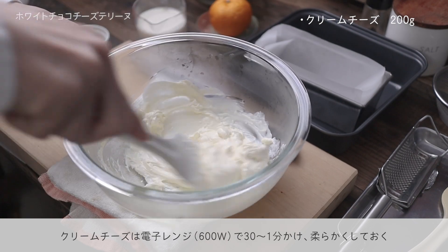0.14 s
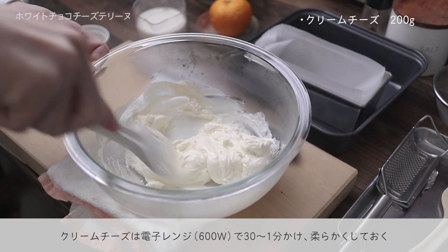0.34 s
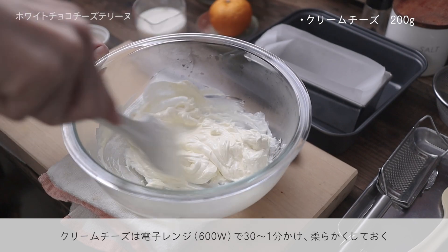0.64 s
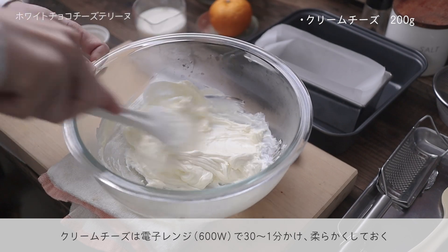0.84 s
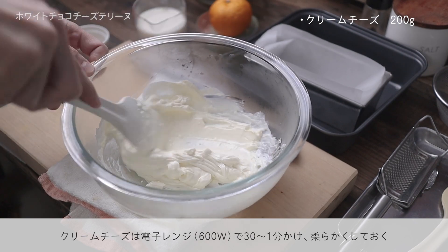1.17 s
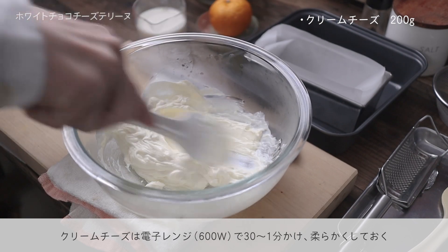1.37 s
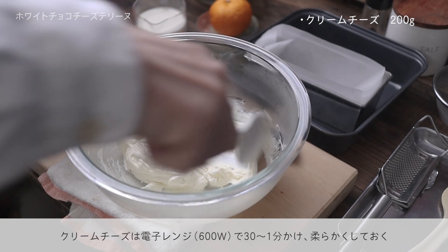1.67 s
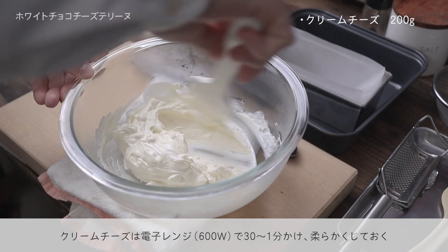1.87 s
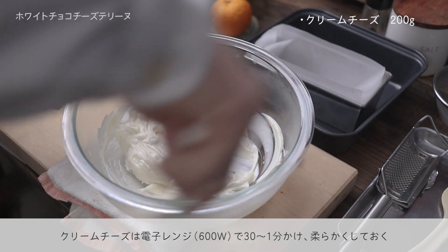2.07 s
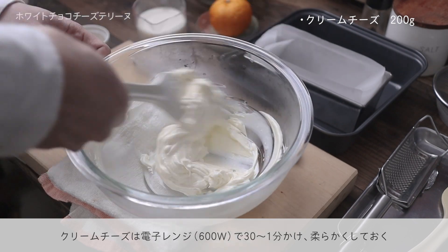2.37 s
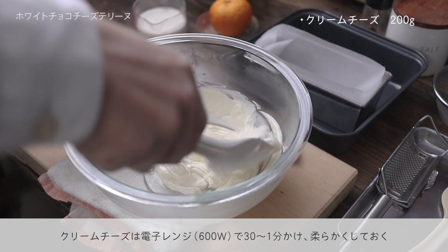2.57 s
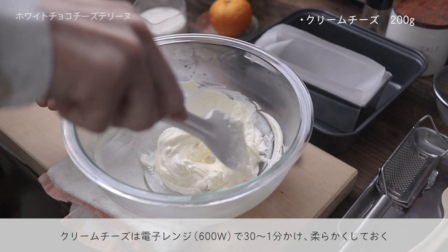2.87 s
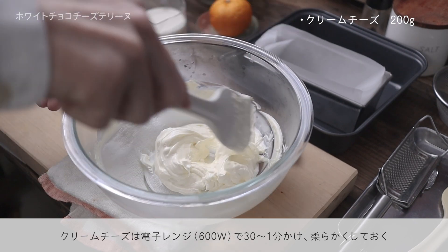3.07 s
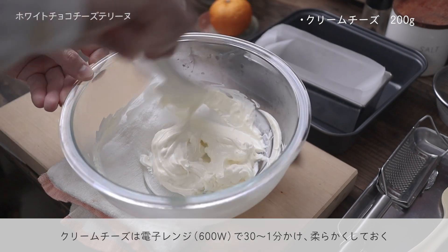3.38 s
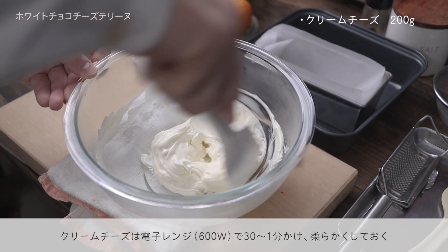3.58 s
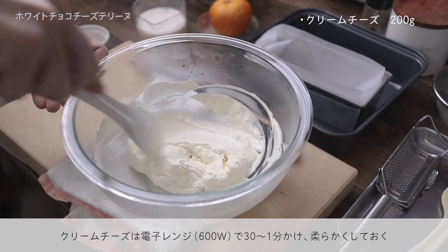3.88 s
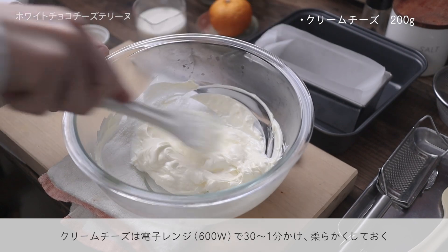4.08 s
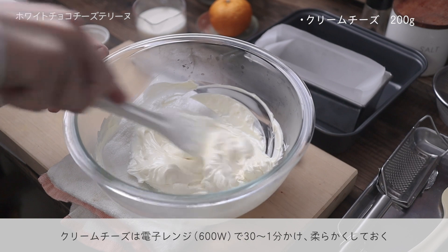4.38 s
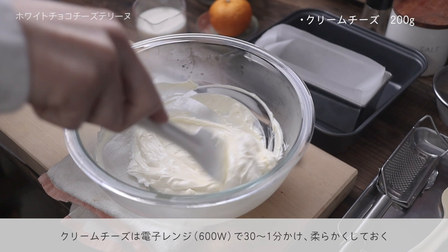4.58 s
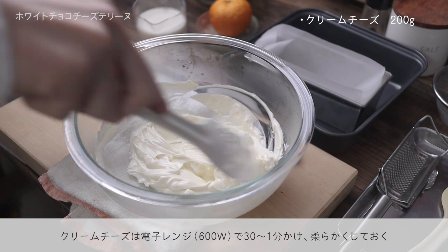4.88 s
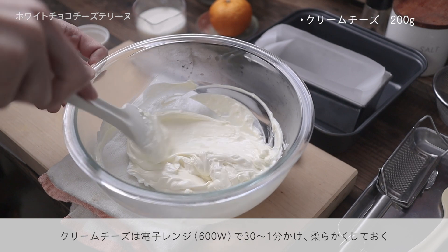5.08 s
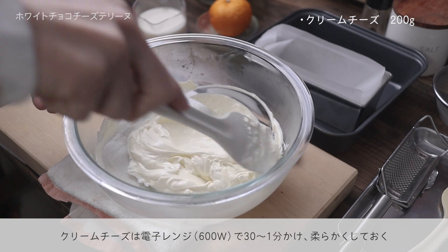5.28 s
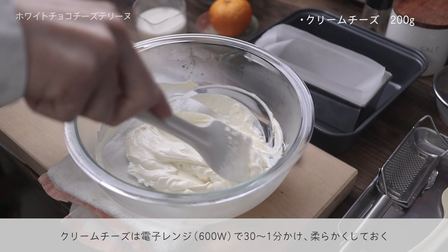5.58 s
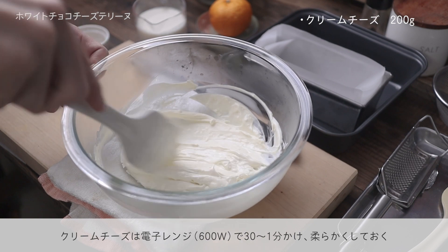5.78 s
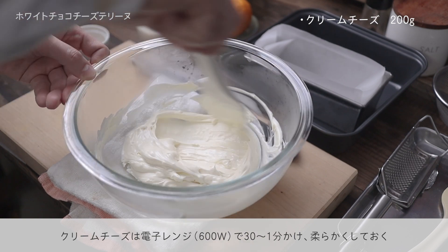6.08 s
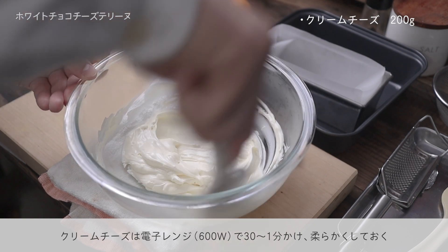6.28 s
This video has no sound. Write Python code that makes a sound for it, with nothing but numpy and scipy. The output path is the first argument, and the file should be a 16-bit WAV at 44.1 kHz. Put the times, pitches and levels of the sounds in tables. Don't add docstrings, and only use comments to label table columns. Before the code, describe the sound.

Close wet snaps and squelchy pops from thick cheese paste in a glass bowl, busy at first, then sparse, over kitchen fan noise.

```python
import sys
import numpy as np
from scipy import signal
from scipy.fft import rfft, irfft, next_fast_len
from scipy.io import wavfile
from scipy.ndimage import uniform_filter1d, minimum_filter1d

SR = 44100
rng = np.random.default_rng(int(sys.argv[2]) if len(sys.argv) > 2 else 0)


def generate_wav(sig):
    pcm = np.round(np.clip(np.atleast_2d(sig).T, -1, 1) * 32767).astype(np.int16)
    wavfile.write(sys.argv[1], SR, pcm)


def invert_db(x):
    u = np.asarray(x, float) / 20
    return 10 ** u


N = 284004


def at_hz(points, hz, column=1):
    table = np.array(points)
    return np.interp(np.log(hz), np.log(table[:, 0]), table[:, column])


def rms_one(x):
    return x / np.sqrt(np.mean(x ** 2) + 1e-20)


def bandpass(x, low_hz, high_hz):
    return signal.sosfilt(signal.butter(2, [low_hz, high_hz], "band", fs=SR, output="sos"), x)


# frequency in Hz, density in dB per Hz.
AIR_SPECTRUM = [(22, -18.5), (33, -20), (43, -6), (69, -11), (135, 0.5), (281, -2), (616, -5.5), (920, -10),
                (1000, -3.5), (2300, -11), (5500, -18.5), (10500, -31), (15700, -31.5), (16100, -61)]
# centre in Hz, width in Hz, boost in dB.
DUCT_MODES = [(41.2, 13, 8), (136, 16, 1), (220, 18, 6.5), (283.7, 10, 5), (517.8, 17, 7.5),
              (709.7, 69, 10.5), (1050, 64, 6), (1415, 54, 7.5), (1800, 50, 7.5), (2140, 86, 6),
              (2970, 190, 5.5), (4550, 1100, 4.5)]
HUM_DB = -43.5


def hum():
    size = next_fast_len(N)
    hz = np.maximum(np.arange(size // 2 + 1) * SR / size, 1)
    level_db = at_hz(AIR_SPECTRUM, hz)
    for centre_hz, width_hz, boost_db in DUCT_MODES:
        level_db = level_db + boost_db / (1 + (2 * (hz - centre_hz) / width_hz) ** 2)
    spectrum = rfft(rng.standard_normal(size)) * invert_db(level_db)
    return invert_db(HUM_DB) * rms_one(irfft(spectrum, size)[:N])


ATTACK, DECAY = 1.6, 0.85
PITCH_RISE = 0.16


def add_burst(out, start_s, peak_db, hz, length_ms, phase):
    half = max(length_ms, 0.1) * SR / 2000
    u = np.arange(-int(3 * half) - 1, int(10 * half) + 2) / half
    shape = np.where(u < 0, np.exp(-ATTACK * u ** 2), 1 / np.cosh(DECAY * u))
    glide = PITCH_RISE * np.log(np.cosh(u / 2))
    turn = 2 * np.pi * min(hz, 16400) * half / SR * (u + 2 * glide)
    at = np.clip(round(start_s * SR) + np.round(u * half).astype(int), 0, N - 1)
    out[at] += invert_db(peak_db) * shape * np.cos(turn + phase)


# start in seconds, peak level in dB, frequency in Hz, length in ms.
BOWL_PUSHES = [
    (1.53, -49, 45, 59),
    (1.8, -54, 45, 40),
    (5.42, -46, 40, 22),
    (5.472, -41, 57, 37),
    (5.488, -38.5, 210, 28),
    (6.275, -38, 209, 13),
]


def thuds():
    out = np.zeros(N)
    for row, phase in zip(BOWL_PUSHES, rng.uniform(0, 2 * np.pi, len(BOWL_PUSHES))):
        add_burst(out, *row, phase)
    return out


# time in seconds, hiss level in dB.
BLADE_DRAG = [(0.0, -80), (0.29, -64), (0.57, -69), (0.84, -74.5), (1.24, -72.5), (1.43, -82),
              (2.02, -57.5), (3.26, -84.5), (3.73, -65), (3.95, -86), (4.86, -72.5), (6.44, -68.5)]
CRACKLES_PER_S = 70


def smear():
    drag_s, drag_db = np.transpose(BLADE_DRAG)
    born = rng.random(N) < CRACKLES_PER_S / SR
    size_db = 4.0 * np.minimum(rng.exponential(1, N), 4) - 54.5
    sizes = invert_db(size_db) * rng.choice([-1, 1], N)
    crackles = bandpass(born * sizes + 1e-18, 7000, 16000)
    hiss = rms_one(bandpass(rng.standard_normal(N), 7000, 16000))
    hiss_db = np.interp(np.arange(N) / SR, drag_s, drag_db) - 10
    return crackles, hiss * invert_db(hiss_db)


# delay in ms, level in dB.
ECHO_DECAY = [(0, -56.5), (2, -29.5), (6, -34), (12, -32.5), (30, -40.5), (50, -49.5), (65, -55),
              (100, -71), (200, -90)]
# frequency in Hz, level in dB, extra loss in dB per second.
ECHO_COLOUR = [(698, 6, -6), (2000, -1, 0), (5000, -3, 33), (9000, -11, 71), (15000, -6.5, 84)]


def echo(x):
    ms = np.arange(SR // 5) / SR * 1000
    edges = 500 * 2 ** np.arange(0, 5.1, 0.5)
    white = rng.standard_normal((2, len(ms)))
    answer = 0
    for k, (low, high) in enumerate(zip(edges, edges[1:])):
        hz = np.sqrt(low * high)
        loss_db = at_hz(ECHO_COLOUR, hz, column=2) * ms / 1000
        band = bandpass(white[k % 2], low, high)
        answer = answer + band * invert_db(at_hz(ECHO_COLOUR, hz) - loss_db)
    envelope = invert_db(np.interp(ms, *np.transpose(ECHO_DECAY)))
    return signal.oaconvolve(x, answer * envelope)[:N]


# time before the burst in ms, level in dB.
LEAD_IN_SWELL = [(0, -24), (4, -58), (12, -52.5), (25, -69)]


def lead_in(x):
    ms = np.arange(SR // 30) / SR * 1000
    swell = rng.standard_normal(len(ms)) * invert_db(np.interp(ms, *np.transpose(LEAD_IN_SWELL)))
    return signal.oaconvolve(x[::-1], swell)[:N][::-1]


# start in seconds, peak level in dB, cavity frequency in Hz, length in ms,
# mouth snap level in dB.
SHALLOW_POCKETS = [(0.066, -25.5, 4800, 0.19, -42), (.2764, -24, 3250, 1.5, -42.5),
                   (.35, -9.5, 3250, .36, -38.5), (.369, -9.5, 3200, .36, -27),
                   (0.4649, -10, 3780, .36, -55), (0.4718, -15, 2470, .57, -35),
                   (.4908, -22, 5570, 0.28, -40.5), (.6285, -5, 5000, .18, -17),
                   (.9416, -13.5, 3300, .6, -24), (0.9456, -3, 6400, .4, -6),
                   (1.2166, -35.5, 4500, .5, -30.5), (1.236, -3, 1850, 1.7, -40),
                   (1.2398, -2, 4100, .35, -16), (1.2429, -12, 4600, .4, -19),
                   (1.477, -21.5, 2150, .74, -58), (1.8715, -33.5, 4650, .3, -41.5),
                   (2.196, -32, 6030, 0.42, -37.5), (2.5244, -35.5, 4830, .3, -45),
                   (4.6455, -26.5, 5570, 0.29, -53), (4.8199, -9, 3500, .9, -33),
                   (5.1535, -28, 3500, 2.1, -36), (5.4675, -34, 3300, .4, -29),
                   (5.483, -2.5, 4900, .52, -12), (5.7979, -24, 7800, .24, -49)]
# start in seconds, peak level in dB, cavity frequency in Hz,
# level change from mode to mode in dB, mouth snap level in dB.
DEEP_POCKETS = [
    (0.5217, -31, 2100, -1, -65),
    (0.6286, -30.5, 1300, 0.5, -40.5),
    (.9461, -19, 1300, .5, -29.5),
    (1.2359, -16, 1150, .8, -28),
    (1.477, -33.5, 900, -3.5, -50),
    (1.5309, -13, 1500, -5, -27),
    (4.5284, -15, 1200, .3, -36),
    (5.483, -14, 1800, .8, -30),
]
CAVITY_MODES = [(1, 0), (1.68, 1), (2.5, 2), (3.4, 3.5)]
# start in seconds, peak level in dB, frequency in Hz, length in ms.
SMALL_BLISTERS = [(0.0567, -33.5, 1427, 1.3), (0.0932, -26.5, 5130, 0.14), (.1415, -26.5, 7100, .35),
                  (.238, -38, 4030, .6), (.2438, -33.5, 6550, .62), (.5601, -19, 3500, .5),
                  (.714, -34.5, 5650, .76), (.722, -33.5, 6030, .27), (.7337, -15.5, 4700, .33),
                  (.914, -34.5, 5660, .55), (.9442, -14, 3700, .9), (1.2308, -30, 3200, .57),
                  (1.233, -24.5, 8200, 0.49), (1.2405, -11, 2150, 7.), (1.3077, -19.5, 3990, .62),
                  (1.616, -29, 3530, .63), (2.246, -34.5, 4110, .37), (2.4757, -36, 5300, .24),
                  (3.7337, -22, 6000, .45), (4.349, -34, 2850, .77), (4.5288, -15, 1050, 2.4),
                  (4.7299, -37.5, 3480, .74), (4.8271, -18, 3900, 0.4), (4.9248, -30.5, 3790, .51),
                  (5.1455, -21, 1300, 2.6), (5.3793, -29.5, 4500, .4), (5.4901, -10, 2800, 0.33),
                  (5.7292, -38.5, 6030, .3), (5.7975, -30.5, 2763, .49), (5.9753, -36, 5510, .32)]
# start in seconds, peak level in dB, frequency in Hz,
# length in ms.
WHISTLING_NECKS = [(0.2087, -24, 2600, 1.3), (.2087, -27, 4430, .65), (.211, -29, 2580, .72),
                   (.2099, -38, 12580, .16), (0.521, -25, 1750, 1.97), (.5213, -25, 3300, .5),
                   (.6285, -23.5, 2250, 1.2), (.9414, -22, 950, 1.2), (1.2398, -8, 14200, .4),
                   (1.2166, -27.5, 15500, 0.53), (1.2359, -20, 770, 1.9), (1.2398, -9, 6430, .5),
                   (1.474, -36, 14300, .2), (1.5309, -22.5, 7220, 0.47), (1.7538, -40, 5660, .2),
                   (2.1251, -31, 2655, 1.22), (2.1257, -26.5, 4450, .8), (2.1252, -28, 10000, .1),
                   (3.0945, -48, 2196, .6), (1.531, -27, 820, 1.5), (3.3936, -44.5, 2200, .6),
                   (3.8042, -38, 4650, .5), (4.0852, -45, 13440, .22), (4.5285, -26, 14800, .3),
                   (4.8199, -15, 2850, .9), (4.8199, -25, 4700, .7), (4.8278, -38, 12060, .3),
                   (4.5286, -28, 10200, .3), (5.1533, -35, 2630, 1.2), (5.4824, -19, 15800, .6)]
# start in seconds, peak level in dB, frequency in Hz.
TEARING_FILMS = [(.0679, -39, 8400), (.0764, -38, 12920), (.3862, -44, 11540), (.494, -26.5, 12230),
                 (.502, -30, 8360), (.5952, -38, 14130), (.6258, -34, 12100), (.8746, -40, 12880),
                 (.916, -38, 10700), (.922, -39, 14130), (.9459, -4, 12500), (1.0035, -27, 8750),
                 (1.0405, -38, 13780), (1.1675, -40, 12580), (1.785, -34, 14800), (1.8285, -31, 10000),
                 (1.8715, -17, 14600), (2.4919, -40, 15100), (2.891, -37.5, 12400), (3.5538, -37, 13000),
                 (3.5657, -38, 13090), (3.5782, -39, 12230), (3.873, -41, 13090), (3.9766, -43, 11540),
                 (4.2292, -39, 13500), (4.2861, -36, 10900), (4.3462, -34.5, 11200), (5.4609, -36.5, 11600),
                 (6.0168, -26, 15000), (6.0708, -37, 13400)]
# frequency in Hz, level in dB.
MOUTH_BANDS = [(8100, -1), (10300, -14.0), (12800, -4.0), (15200, -12)]
CAVITY_CYCLES = 1.98
FILM_MS, SNAP_MS = 0.15, 0.3


def bursts():
    rows = []
    for start_s, peak_db, lowest_hz, step_db, _ in DEEP_POCKETS:
        for ratio, steps in CAVITY_MODES:
            hz = lowest_hz * ratio
            rows.append((start_s, peak_db + steps * step_db, hz, 1000 * CAVITY_CYCLES / hz))
    rows += [row[:4] for row in SHALLOW_POCKETS]
    rows += SMALL_BLISTERS + WHISTLING_NECKS
    rows += [(*row, FILM_MS) for row in TEARING_FILMS]
    for row in DEEP_POCKETS + SHALLOW_POCKETS:
        rows += [(row[0], row[4] + db, hz, SNAP_MS) for hz, db in MOUTH_BANDS]
    out = np.zeros(N)
    phases = rng.normal(np.pi / 2, 0.4, len(rows))
    for row, phase in zip(rows, phases):
        add_burst(out, *row, phase)
    return signal.sosfilt(signal.butter(4, 750, "high", fs=SR, output="sos"), out + 1e-18)


def scene():
    air = hum()
    crackles, hiss = smear()
    paste = bursts() + crackles
    return (paste + lead_in(paste) + echo(paste) + hiss + thuds() + air)[None]


GATE_DEPTH_DB, GATE_OVER_DB, GATE_KNEE_DB = 10, 10.5, 2.5


def noise_gate(x):
    size = next_fast_len(N)
    spectrum, hz = rfft(x, size), np.arange(size // 2 + 1) * SR / size
    edges = np.append(960 * 2 ** (np.arange(12) / 3), SR)
    out = x.copy()
    for low, high in zip(edges, edges[1:]):
        band = irfft(spectrum * ((hz >= low) & (hz < high)), size)[:N]
        level_db = 10 * np.log10(uniform_filter1d(band ** 2, size=300)[::50] + 1e-12)
        threshold_db = np.median(level_db) + GATE_OVER_DB
        opened = 1 / (1 + np.exp((threshold_db - level_db) / GATE_KNEE_DB))
        held = -minimum_filter1d(-opened, size=39, origin=19)
        shut = 1 - np.repeat(uniform_filter1d(held, size=7), 50)[:N]
        out += band * (invert_db(-GATE_DEPTH_DB * shut) - 1)
    return out


def band_limit(x):
    return signal.sosfilt(signal.butter(12, 16820, fs=SR, output="sos"), x)


def record(dry):
    over_db = np.maximum(20 * np.log10(np.abs(dry[0]) + 1e-9) + 18, 0)
    fall_db = 94.0 * np.arange(N) / SR
    held_db = np.maximum.accumulate(over_db + fall_db) - fall_db
    duck_db = -0.22 * uniform_filter1d(held_db, size=300, origin=149)
    clipped = np.clip(noise_gate(dry[0])[None] * invert_db(duck_db), -1, 1)
    top_cut = signal.cheby2(10, 50, 16800, fs=SR, output="sos")
    mix = np.clip(signal.sosfilt(top_cut, clipped), -1, 1)
    return band_limit(mix)


dry = scene()
out = record(dry)
generate_wav(out)
```